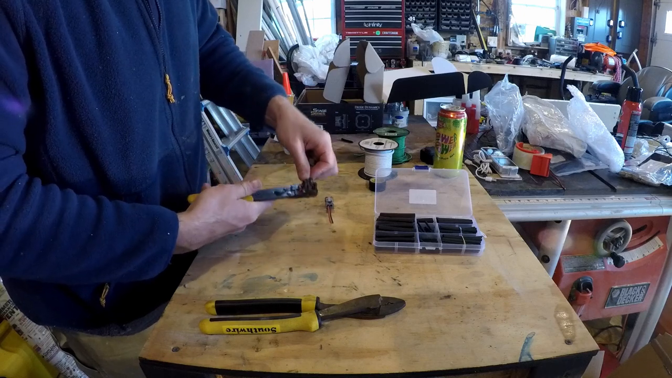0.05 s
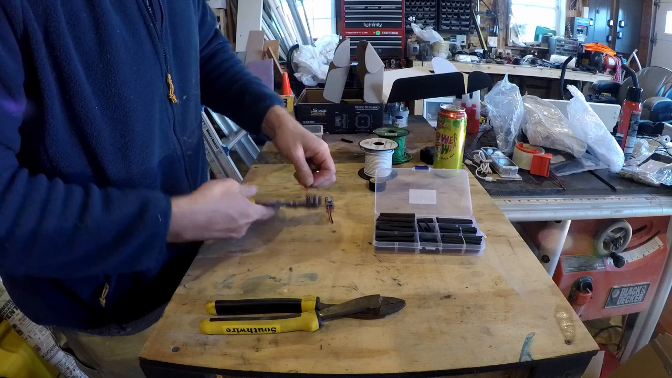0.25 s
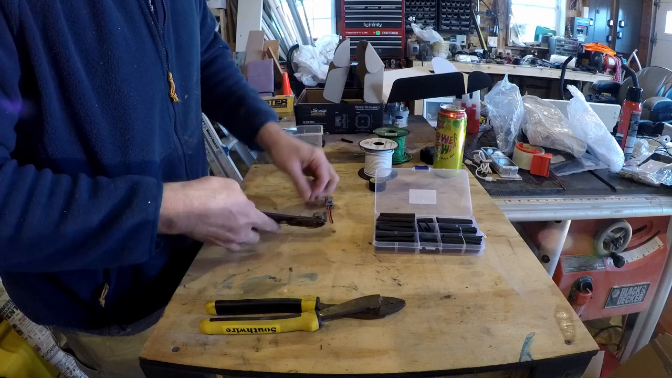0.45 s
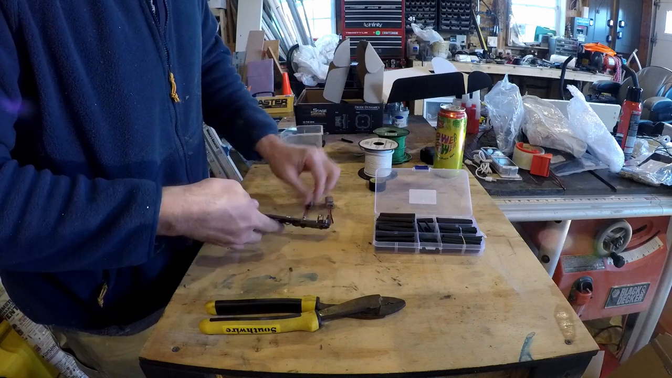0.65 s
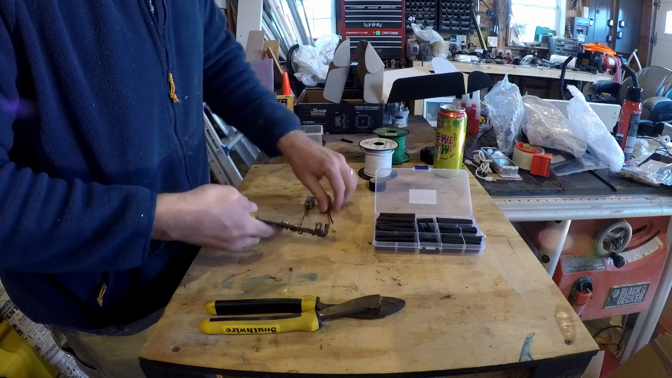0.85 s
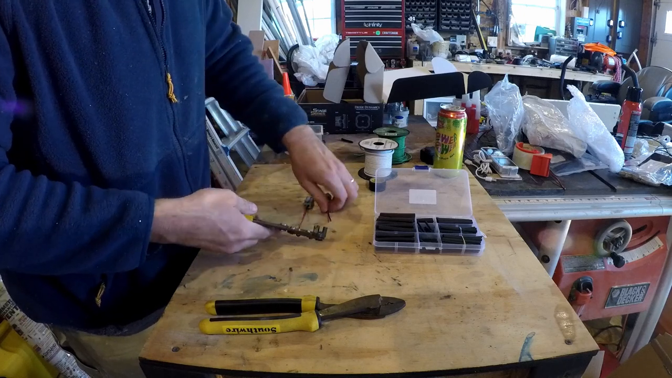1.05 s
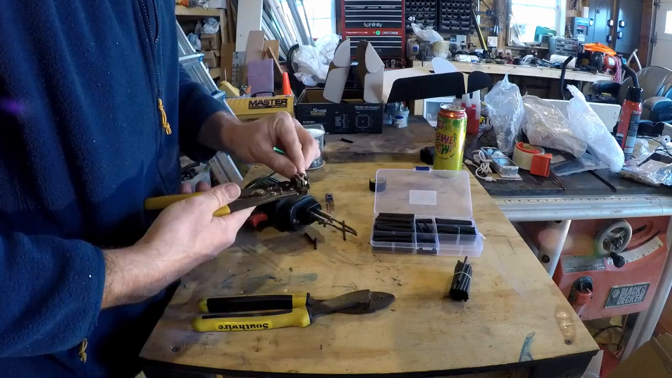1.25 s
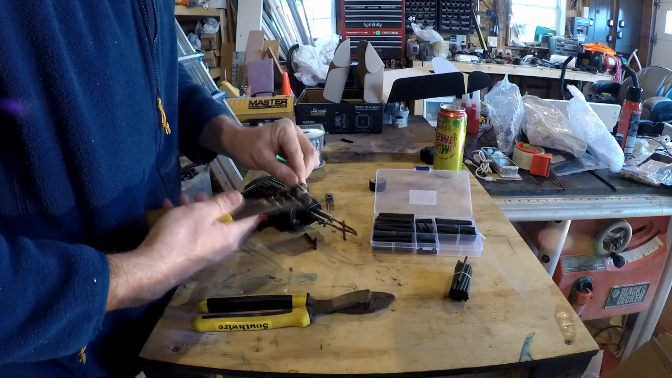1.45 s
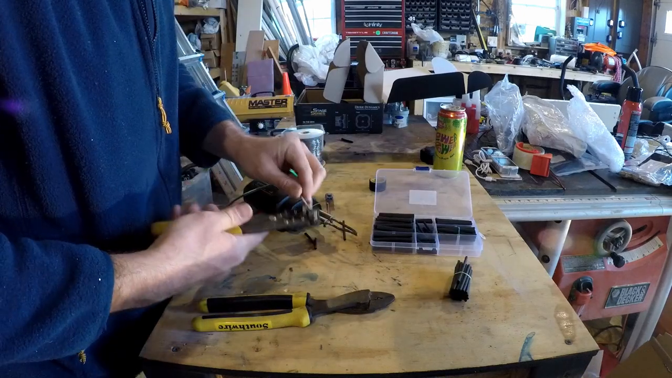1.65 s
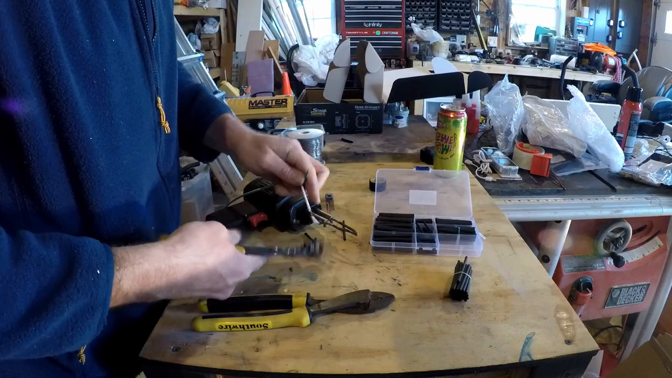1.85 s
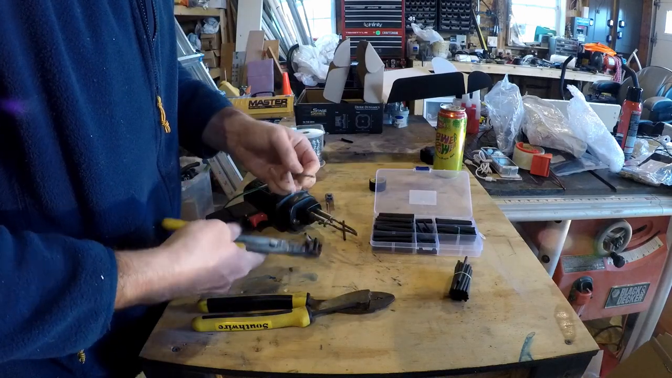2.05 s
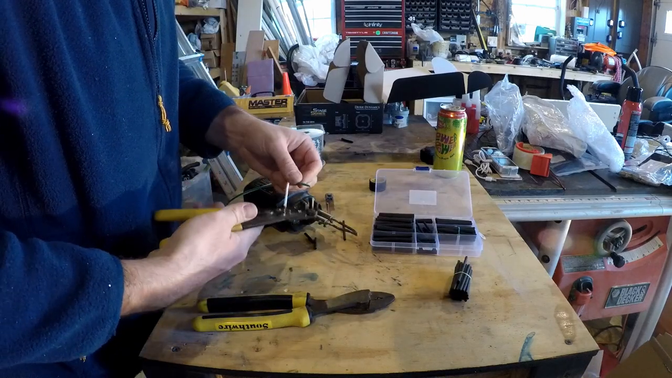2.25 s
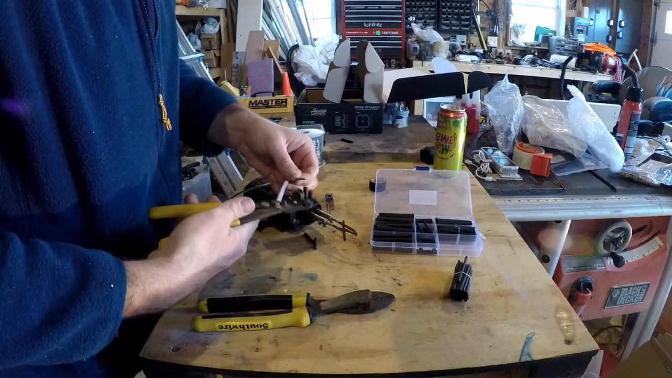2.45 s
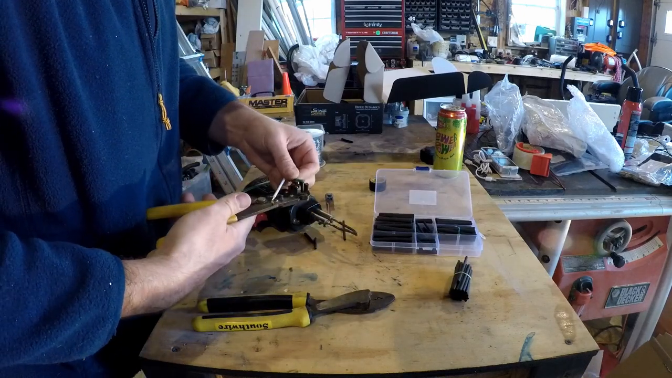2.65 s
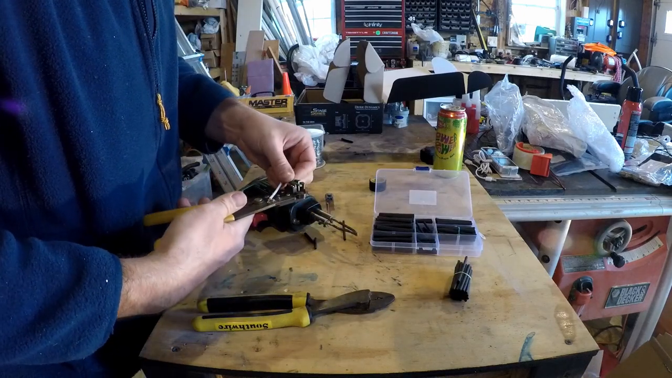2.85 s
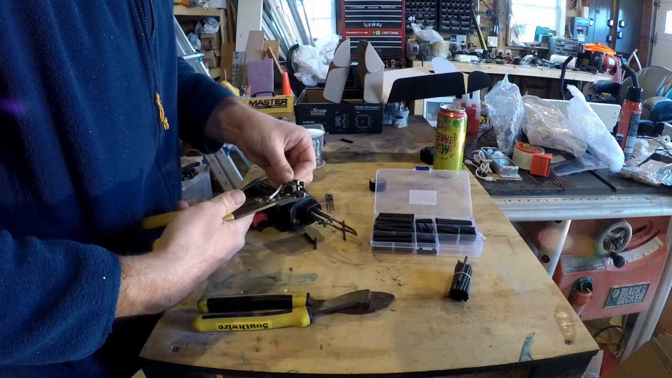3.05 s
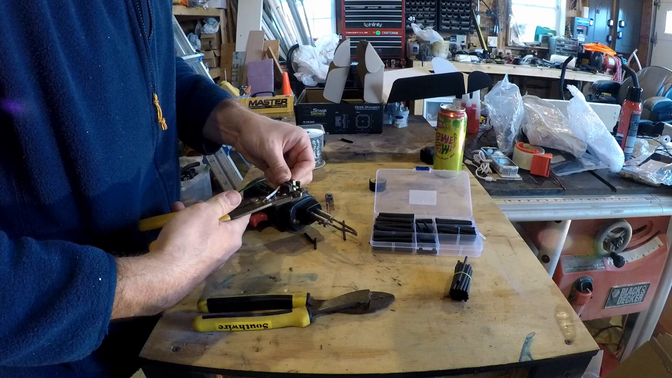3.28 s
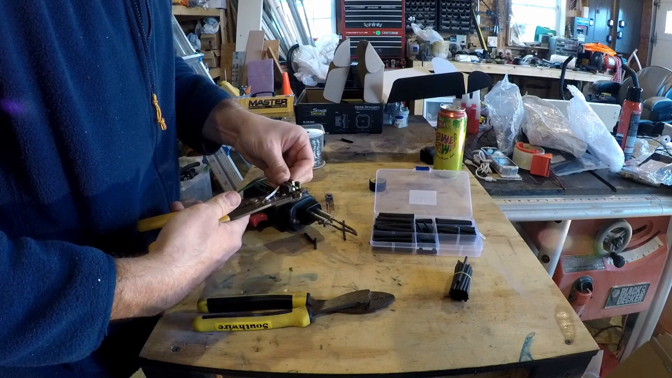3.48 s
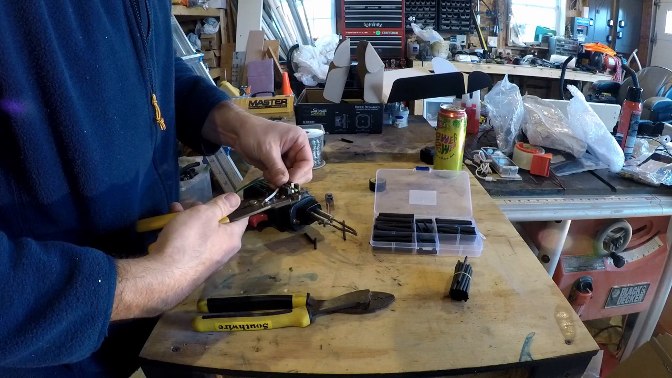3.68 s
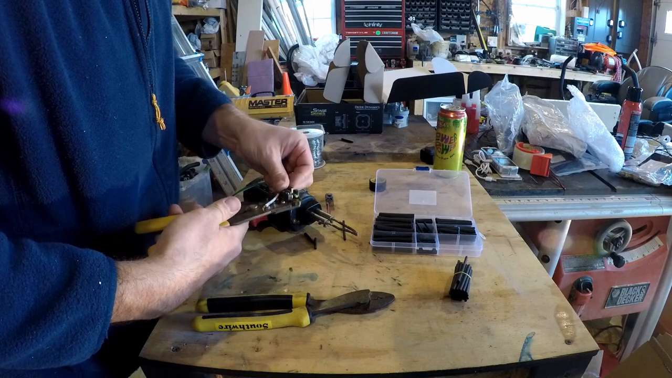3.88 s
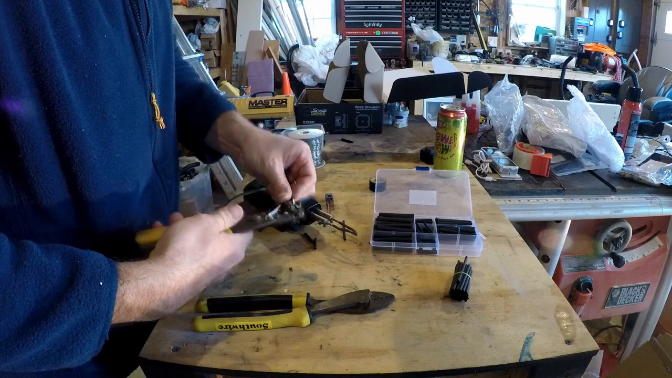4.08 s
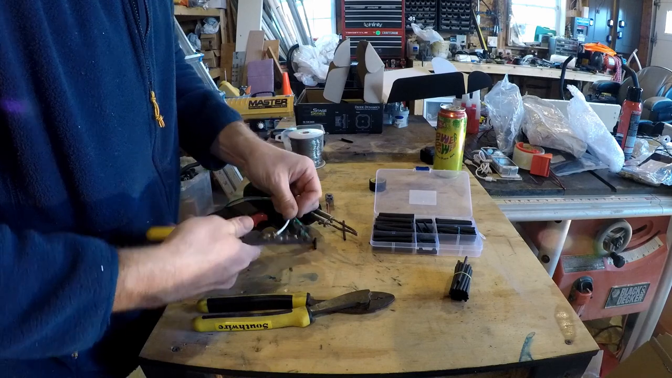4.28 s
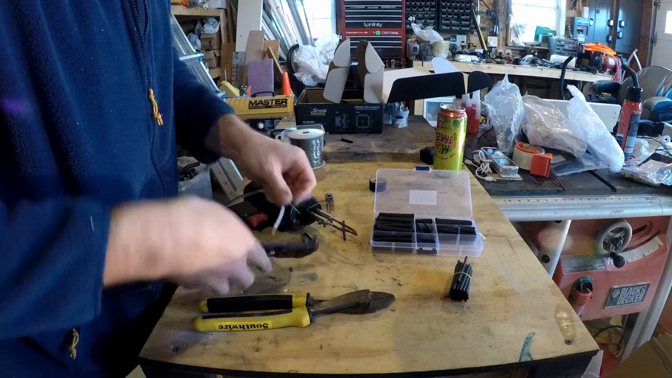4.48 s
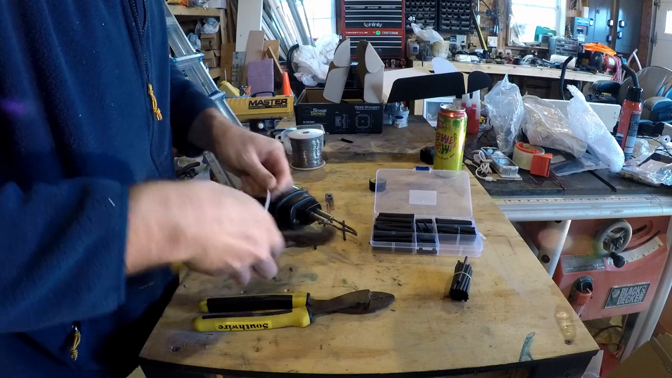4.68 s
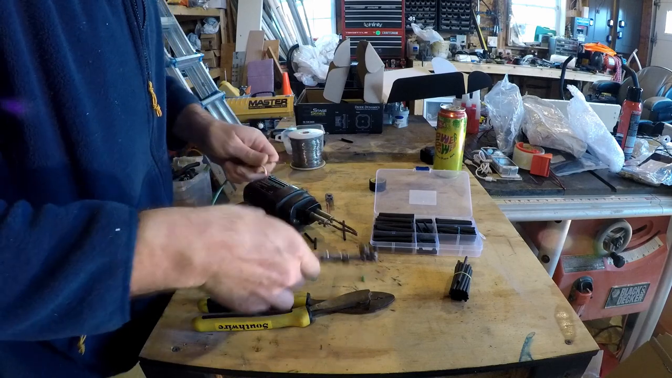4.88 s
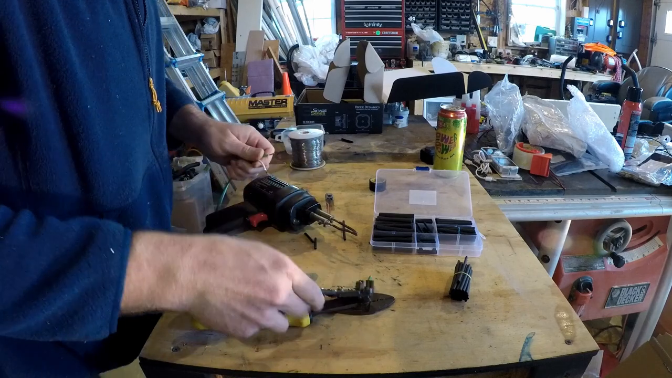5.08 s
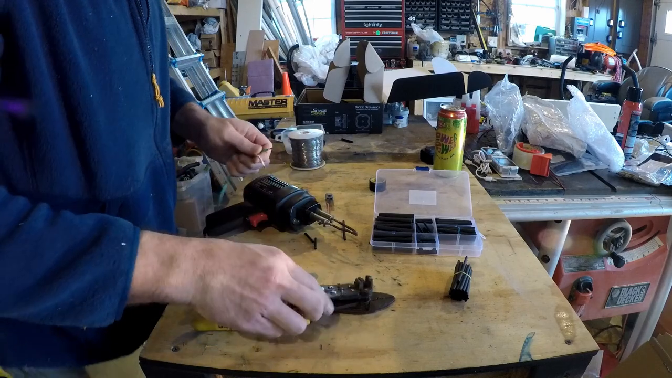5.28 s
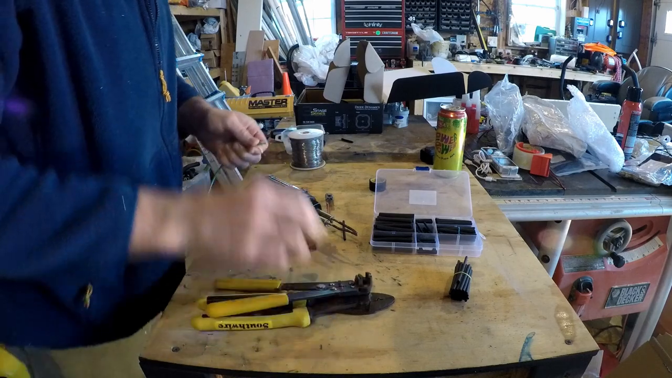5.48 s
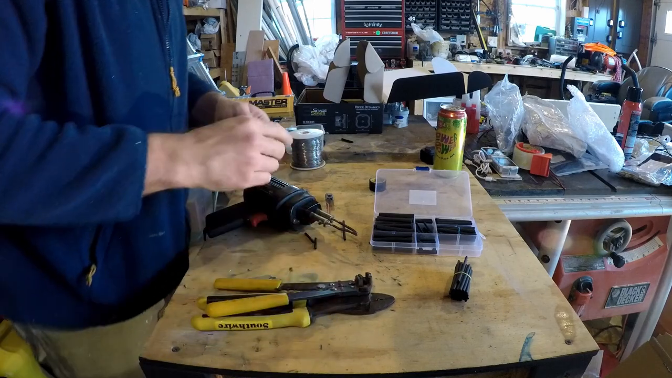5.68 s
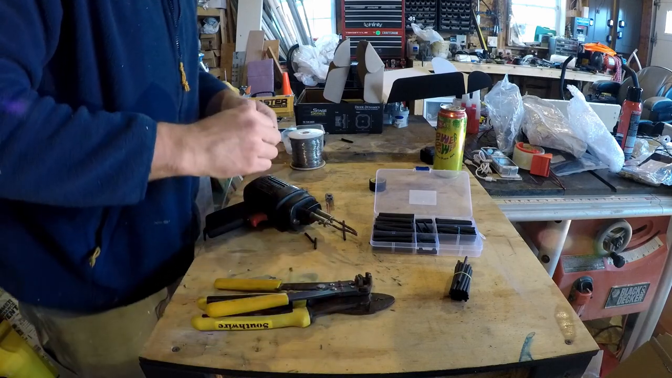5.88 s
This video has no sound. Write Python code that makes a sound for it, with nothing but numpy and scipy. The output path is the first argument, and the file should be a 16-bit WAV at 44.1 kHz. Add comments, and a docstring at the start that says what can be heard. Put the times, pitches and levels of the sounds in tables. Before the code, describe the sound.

Wire strippers tick, nip and snap sharply in a quiet garage, one loud crack early, then the tool clatters down onto pliers on a wooden bench.

```python
"""Quiet garage, wooden bench: self-adjusting wire strippers work on thin wires in still air.
Jaws bite, linkage ticks, insulation parts, the spring snaps the jaws back; once the tool lets go with a loud crack.
Near the end it is dropped and clatters against pliers. Contacts are filtered noise bursts, bench and steel add
damped modes, rubbing and air are coloured noise. Decaying noise gives the room's answer to every contact."""
import sys
import numpy as np
from scipy import signal
from scipy.fft import rfft, irfft
from scipy.io import wavfile
from scipy.ndimage import uniform_filter1d

SR = 44100
rng = np.random.default_rng(int(sys.argv[2]) if len(sys.argv) > 2 else 0)


def wrap_up_sound(samples):
    """Save the sound to the file named by the first command line argument, as 16-bit audio."""
    columns = np.atleast_2d(samples).T
    # keep every value between -1 and 1, then stretch to whole-number steps
    tamed = np.clip(columns, -1, 1)
    steps = np.round(tamed * 32767).astype(np.int16)
    wavfile.write(sys.argv[1], SR, steps)


N = 261424

# Levels are relative; each source adds its own gain.
# still air, spectral density: hz, level_db
AIR_COLOUR = [(12, -37.5), (20, -1), (33, -7), (109, -8.5), (136, -12.5), (180, -7), (212, -11.5),
              (296, -10.5), (322, -15.5), (437, -15), (475, -18), (531, -16), (1290, -23.5), (2660, -29),
              (15300, -37.5)]
# room decay: hz, t60_s
GARAGE_DECAY = [(100, .4), (300, 0.41), (800, .4), (2000, .47), (5500, .4), (9000, 0.32), (14600, 0.4)]
# hands shift the wire and its load on the bench: peak_s, length_s, rub_db, rumble_db
HANDLING_MOVES = [(0.941, 0.33, -51.5, -55.5), (1.136, .1, -60.5, -57), (1.55, 0.23, -55, -60),
                  (2.129, 0.46, -61, -85.5), (4.153, .15, -61, -52), (4.47, 0.43, -58.5, -54.5),
                  (4.644, 0.21, -56.5, -79.5), (5.76, .4, -68.5, -66), (5.92, 0.19, -52, -71)]
# rubbing spectrum: hz, level_db
RUB_COLOUR = [(40, -6), (200, -3.5), (600, 1.5), (1300, -8), (3000, -11.5), (5000, -21), (15000, -32)]
# bench rumble spectrum: hz, level_db
RUMBLE_COLOUR = [(20, -0.5), (60, -1), (120, -3.5), (300, -3), (600, -16), (2000, -46), (15000, -51)]
# tool lands and settles: start_s, bench_db, hardness_hz, steel_db, first_flight_s
BLOWS = [(5.0907, -12, 860, -8.5, 0.0099), (5.0995, -11, 850, -21, .011), (5.11, -16, 1780, -33, .012),
         (5.2306, -27, 1100, -61, .02), (5.3145, -16, 770, -21.5, .016), (5.3553, -16, 815, -27.5, .018),
         (5.361, -9, 378, -37, 0.0122), (5.373, -23.5, 1005, -30, .008), (5.392, -14.5, 2170, -38, .006),
         (5.428, -24, 900, -48, .017), (5.4753, -18.5, 1870, -50, .025)]
# modes of the loaded, damped bench top: hz, level_db, t60_s
BENCH_MODES = [(102, -12, .36), (140, -12, .15), (187, 0, .14), (215, -3, .12), (248, -4, .15),
               (280, -3, .17), (414, -8, .12), (450, -10, .1), (549, -4, .13), (729, -3, .1), (856, -8, .1),
               (990, -5, .09), (1212, -5, .08), (1459, -12, .07), (1692, -14, .07)]
# modes of the steel jaws: hz, level_db, t60_s
STEEL_MODES = [(2500, -8, .04), (2676, -9, .04), (5300, -6, .04), (6040, -1, .08), (6140, -3, .11),
               (6300, -3, .08), (7800, -7, .05), (8450, -8, .05)]
# blow on wood, spectrum: hz, level_db
WOOD_COLOUR = [(30, -21), (70, -13), (180, 2.5), (300, 0.5), (400, -1), (560, -1), (1050, -1), (1500, -5),
               (2500, -8.5), (4000, -16.5), (8000, -27), (15000, -30)]
# blow on steel, spectrum: hz, level_db
CLANK_COLOUR = [(300, -12), (1500, -4.5), (2500, 3), (3500, -2), (6000, 1.5), (6900, -3.5), (8200, 2.5),
                (10200, -11.5), (12000, -9), (15000, -17.5)]
# tool slides over the pliers: start_s, end_s, level_db, resonance_hz
SCRAPES = [(5.317, 5.445, -37, 1240), (5.472, 5.526, -55, 1480)]
# scrape spectrum: hz, level_db
SCRAPE_COLOUR = [(100, 6), (600, 6.5), (1500, -8.5), (3000, -6), (6000, -27.5), (15000, -38)]
# runs of linkage slips: start_s, length_s, last_slip_db, treble_db
TICK_RUNS = [(0.0946, 0, -40, 13.5), (0.22, 0.0056, -29, -5.5), (.2462, 0.001, -29, -4.5),
             (0.2584, 0.0036, -37.5, -2), (0.2746, 0.0016, -38, -4), (1.7126, 0.005, -26, -6.5),
             (1.7266, 0.0047, -26, 0.5), (2.7078, 0.0022, -44.5, -3), (2.8076, 0, -45.5, -7),
             (4.3174, 0.0042, -25, -5), (4.3312, 0.0029, -20.5, 1.5), (4.343, 0.0071, -26.5, 1.5),
             (4.5026, 0.0025, -44.5, 2), (5.2492, 0, -37, -8), (5.413, 0.00064, -30, -6),
             (5.428, 0.0031, -33.5, 4), (5.4485, 0.0015, -43.5, 7)]
# slip spectrum: hz, level_db
TICK_COLOUR = [(100, -30), (1300, -13), (2500, -2.5), (4000, -4.5), (6000, -3.5), (6900, -4), (8000, 1),
               (9800, -11), (11800, -2), (15000, -13.5)]
# jaws nip the wire: start_s, level_db, treble_db, resonance_hz, second_blade_lag_s
BITES = [(.1522, -41.5, -11.5, 684, 0.0029), (2.116, -29.5, -1.5, 1460, .007),
         (2.2403, -39.5, 4, 2920, .0225), (3.1608, -44.5, -0.5, 1900, 0.0031),
         (4.2051, -45, -13, 1700, .003), (4.6459, -32.5, -2, 1690, .011), (4.6916, -41, -2, 3840, 0.031),
         (5.9056, -40, -18, 2517, .017)]
# nip spectrum: hz, level_db
BITE_COLOUR = [(100, -15.5), (500, -6), (1300, -9), (2400, -2.5), (3600, -1.5), (4400, -6.5), (7000, -12),
               (8200, -9.5), (10000, -16), (12500, -19), (15000, -20.5)]
# blades catch, drag, break through insulation:
# start_s, drag_s, catch_db, break_db, treble_db, jaw_hz, drag_hz
STRIPS = [(0.0409, .013, -30.5, -26, 2.5, 2520, 2200), (1.524, 0.0097, -18.5, -19, 2.5, 2670, 965),
          (4.1334, .0088, -24.5, -15, 0, 3530, 2800)]
# tool lets go under load: start_s, level_db
CRACKS = [(0.638, -3.5)]
# crack, direct spectrum: hz, level_db
CRACK_COLOUR = [(80, -27.5), (300, -9), (550, -6), (1500, -9.5), (2600, -3.5), (3900, -4), (5000, -16),
                (6400, -30), (7900, -17.5), (9800, -37), (11500, -29), (15000, -40.5)]
# crack, spectrum fed to the room: hz, level_db
BODY_COLOUR = [(100, -20), (300, -10), (550, -2), (1400, -7.5), (2100, -2), (3000, -4), (4200, -10),
               (5200, -15), (6100, -30), (8000, -25), (10000, -37), (15000, -32)]
# spring snaps the jaws back: start_s, level_db, reflection_db, treble_db, resonance_hz
SNAPS = [(0.4999, -11.5, -5.5, -1, 12800), (1.9717, -15, -3, -0.5, 12260), (4.5596, -13, -4, 1.5, 8270)]
# snap spectrum: hz, level_db
SNAP_COLOUR = [(100, -22.5), (1400, -18), (2400, -5), (3400, -12.5), (5000, -3.5), (6300, -4), (7100, -9.5),
               (8300, -1.5), (10200, -9.5), (12800, 1), (13900, -4), (15000, 1)]

TOP_HZ = 15400
SWELL_SHARE, SWELL_DB = .3, 20  # share of a move spent swelling; drop at its ends
# each rebound: shorter flight, softer and weaker contact
FLIGHT_SHARE, SOFTER_SHARE, BENCH_LOSS_DB, STEEL_LOSS_DB = .8, 0.47, 7, 12.5
SLIP_S, SLIP_GROWTH_DB = .0027, 2.5  # nominal spacing; growth per slip
SECOND_BLADE_DB = -4.5
DRAG_DB, CATCH_TREBLE_DB, CATCH_RING_DB = -47, 3, 0  # catch treble is relative to the break
OVERRUN_S = .004  # blades slide on past the break


def amp(db):
    """Decibels to gain."""
    return 10 ** (np.asarray(db) / 20)


def unit(x):
    """Scale to rms 1."""
    return x / np.sqrt(np.mean(x ** 2) + 1e-20)


def along(points, hz):
    """Interpolate (hz, value) points on a log axis."""
    f, v = np.transpose(points)
    return np.interp(np.log(hz + 1), np.log(f + 1), v)


def fade(t, t60_s):
    """Exponential decay, 60 dB in t60_s."""
    return np.exp(-np.log(1000) * t / t60_s)


def add(track, start_s, sound):
    """Mix a sound into the track, cut at its end."""
    part = track[round(start_s * SR):][:len(sound)]
    part += sound[:len(part)]


def noise(colour):
    """Steady coloured noise of rms 1."""
    gain = amp(along(colour, np.fft.rfftfreq(N, 1 / SR)))
    return unit(irfft(rfft(rng.standard_normal(N)) * gain, N))


def shaped(x, gain_db, size=32768):
    """Minimum-phase filter of the given dB response: no sound before the blow."""
    cepstrum = irfft(np.log(amp(gain_db(np.fft.rfftfreq(size, 1 / SR)))))
    cepstrum[1:size // 2] *= 2
    cepstrum[size // 2 + 1:] = 0
    return irfft(rfft(x, size) * np.exp(rfft(cepstrum)))


def burst(decay_s, count=3, size=8192):
    """Dense damped noise of unit energy, repeatedly whitened and faded at twice decay_s."""
    t = np.arange(size) / SR
    x = rng.standard_normal(size) * fade(t, decay_s)
    for _ in range(count):
        spectrum = rfft(x)
        white = irfft(spectrum / (np.abs(spectrum) + 1e-9))
        x = white * fade(t, decay_s * 2)
    return x / np.linalg.norm(x)


def click(colour, decay_s, treble_db=0, ring_hz=3000, ring_db=0, pivot_hz=5000, width=0.073):
    """One contact: treble tilts about a pivot, the place struck favours one resonance."""
    def gain_db(hz):
        tilt = treble_db * (hz ** 2 / (hz ** 2 + pivot_hz ** 2) * 2 - 1)
        resonance = ring_db / (1 + ((hz / ring_hz - 1) / width) ** 2)
        return along(colour, hz) + tilt + resonance

    return shaped(burst(decay_s), gain_db)


def ring(modes, scatter_db, size=32768):
    """Damped modes, struck with new strengths and phases each time."""
    t = np.arange(size) / SR
    out = np.zeros(size)
    for hz, level_db, t60_s in modes:
        strength = amp(level_db + rng.normal(0, scatter_db))
        swing = np.sin(2 * np.pi * (hz * t + rng.random()))
        out += strength * swing * fade(t, t60_s)
    rise = 1 - fade(t, 0.0027)
    return rise * out


def garage(x, build_s=.004):
    """Diffuse room answer: noise decaying per band, drawn anew for every contact."""
    hz, t, z = signal.stft(rng.standard_normal(SR * 2 // 3), SR, nperseg=256)
    decay = fade(t, along(GARAGE_DECAY, hz)[:, None])
    tail = signal.istft(z * decay, SR, nperseg=256)[1]
    tail *= 1 - np.exp(-(np.arange(len(tail)) / SR / build_s) ** 2)
    return signal.fftconvolve(x, tail / np.linalg.norm(tail))[:len(x)]


def still_air():
    """Steady coloured noise of the quiet garage."""
    return amp(-59.0) * noise(AIR_COLOUR)


def handling():
    """Grainy rubbing of hands, sleeve and wire, plus bench rumble; each move swells and fades."""
    t = np.arange(N) / SR
    rub, rumble = np.zeros(N), np.zeros(N)
    for peak_s, length_s, rub_db, rumble_db in HANDLING_MOVES:
        before = (peak_s - t) / SWELL_SHARE
        after = (t - peak_s) / (1 - SWELL_SHARE)
        swell = amp(-SWELL_DB * np.maximum(before, after) / length_s)
        rub += amp(rub_db) * swell
        rumble += amp(rumble_db) * swell
    grip = amp(2.5 * unit(uniform_filter1d(rng.standard_normal(N), size=300)))
    return rub * unit(noise(RUB_COLOUR) * grip) + rumble * noise(RUMBLE_COLOUR)


def contacts(count=3):
    """Each blow and its rebounds: start_s, bench_db, hardness_hz, steel_db."""
    for start_s, bench_db, hardness_hz, steel_db, flight_s in BLOWS:
        for k in range(count):
            softer_hz = hardness_hz * SOFTER_SHARE ** k
            yield start_s, bench_db - k * BENCH_LOSS_DB, softer_hz, steel_db - k * STEEL_LOSS_DB
            start_s = start_s + flight_s * FLIGHT_SHARE ** k


def landing():
    """Each blow thumps the bench, duller for soft grips; bare steel clanks and rings."""
    out = np.zeros(N)
    for start_s, bench_db, hardness_hz, steel_db in contacts():
        boards = amp(-43) * ring(BENCH_MODES, scatter_db=2)
        jaws = amp(-45) * ring(STEEL_MODES, scatter_db=3)
        wood = amp(33.0) * (click(WOOD_COLOUR, decay_s=0.066) + boards)
        thump = shaped(wood, lambda hz: -10 * np.log10(1 + (hz / hardness_hz) ** 4))
        clank = amp(18.5) * (click(CLANK_COLOUR, decay_s=0.015, ring_hz=6060, ring_db=2) + jaws)
        add(out, start_s, amp(bench_db) * (thump + amp(-13.0) * garage(thump)))
        add(out, start_s, amp(steel_db) * (clank + amp(-15.0) * garage(clank)))
    return out


def rasp(length_s, level_db, ring_hz):
    """Stick and slip: a dense run of tiny uneven catches, with its room."""
    size = max(round(length_s * SR), 2)
    caught = rng.random(size) < 1500 / SR  # mean 1500 catches per second
    catches = rng.standard_normal(size) * caught
    direct = signal.fftconvolve(catches, click(SCRAPE_COLOUR, decay_s=0.008, ring_hz=ring_hz, ring_db=15))
    direct *= np.sqrt(size) / (np.linalg.norm(direct) + 1e-9)
    return amp(level_db) * (direct + amp(-9) * garage(direct))


def scrapes():
    """The dropped tool rasps over the pliers as it settles."""
    out = np.zeros(N)
    for start_s, end_s, level_db, ring_hz in SCRAPES:
        add(out, start_s, rasp(end_s - start_s, level_db, ring_hz))
    return out


def ticks():
    """Bright slips of the steel linkage, evenly spaced, growing until the joint comes free."""
    out = np.zeros(N)
    for start_s, length_s, last_db, treble_db in TICK_RUNS:
        slips_s = np.linspace(start_s, start_s + length_s, 1 + round(length_s / SLIP_S))
        for to_go, slip_s in enumerate(slips_s[::-1]):
            ring_hz = 8000 * np.exp(rng.normal(0, 0.18))
            hit = click(TICK_COLOUR, decay_s=.013, treble_db=treble_db, ring_hz=ring_hz, ring_db=4)
            gain = amp(last_db + 15.0 - SLIP_GROWTH_DB * to_go)
            add(out, slip_s, gain * (hit + amp(-14) * garage(hit)))
    return out


def bite(level_db, treble_db, ring_hz, ring_db=9):
    """One short click of a blade, with its plainer room answer."""
    hit = click(BITE_COLOUR, decay_s=0.024, treble_db=treble_db, ring_hz=ring_hz, ring_db=ring_db)
    room = garage(click(BITE_COLOUR, decay_s=0.0075, treble_db=treble_db - 0.5))
    return amp(level_db + 19.5) * (hit + amp(-15) * room)


def bites():
    """Light nips: the second blade meets the wire later and more weakly."""
    out = np.zeros(N)
    for start_s, level_db, treble_db, ring_hz, lag_s in BITES:
        add(out, start_s, bite(level_db, treble_db, ring_hz))
        add(out, start_s + lag_s, bite(level_db + SECOND_BLADE_DB, treble_db, ring_hz, ring_db=7))
    return out


def strips():
    """A bright catch, a short drag, then the click as the insulation parts."""
    out = np.zeros(N)
    for start_s, drag_s, catch_db, break_db, treble_db, jaw_hz, drag_hz in STRIPS:
        add(out, start_s, bite(catch_db, treble_db + CATCH_TREBLE_DB, jaw_hz, CATCH_RING_DB))
        add(out, start_s, rasp(drag_s + OVERRUN_S, DRAG_DB, drag_hz))
        add(out, start_s + drag_s, bite(break_db, treble_db, jaw_hz))
    return out


def cracks():
    """A hard, lower crack that bounces off the bench; its body fills the room."""
    out = np.zeros(N)
    for start_s, level_db in CRACKS:
        hit = click(CRACK_COLOUR, decay_s=0.02435, ring_hz=2590, ring_db=6.5)
        add(hit, .005, amp(-11) * click(CRACK_COLOUR, decay_s=.018))
        room = garage(click(BODY_COLOUR, decay_s=0.0089))
        add(out, start_s, amp(level_db + 22.0) * (hit + amp(-11.0) * room))
    return out


def snaps():
    """Sprung jaws hit their stop; the bench reflects the snap, the room blends all directions: plainer."""
    out = np.zeros(N)
    for start_s, level_db, reflection_db, treble_db, ring_hz in SNAPS:
        def arrival():
            return click(SNAP_COLOUR, decay_s=.016, treble_db=treble_db, ring_hz=ring_hz, ring_db=8, width=.035)

        hit = arrival()
        add(hit, .0028, amp(reflection_db) * arrival())  # off the bench
        add(hit, .007, amp(-18) * arrival())  # second, fainter reflection
        room = garage(click(SNAP_COLOUR, decay_s=.008, treble_db=treble_db))
        add(out, start_s, amp(level_db + 19.5) * (hit + amp(-14.0) * room))
    return out


def scene():
    """The tool over the still air of the garage, one channel."""
    background = still_air() + handling()
    drop = landing() + scrapes()
    tool = ticks() + bites() + strips() + cracks() + snaps()
    return (background + drop + tool)[None]


def record(dry):
    """Steep low-pass, half power at TOP_HZ."""
    hz = np.fft.rfftfreq(N + SR, 1 / SR)
    gain = 1 / np.sqrt(1 + (hz / TOP_HZ) ** 160)
    return irfft(rfft(dry, N + SR) * gain, N + SR)[:, :N]


dry = scene()
out = record(dry)
wrap_up_sound(out)
```